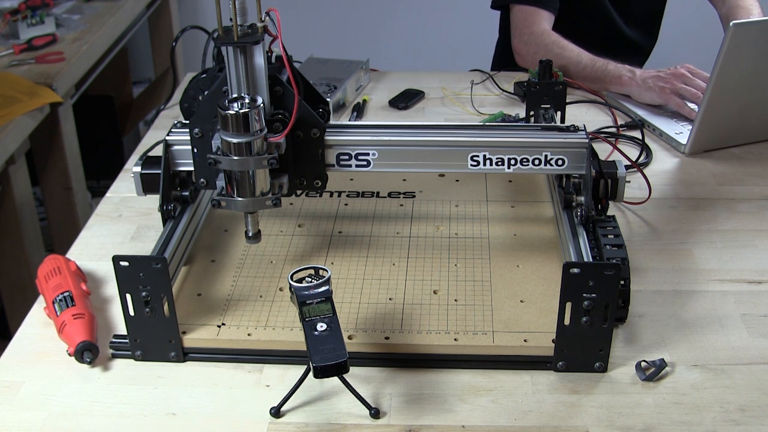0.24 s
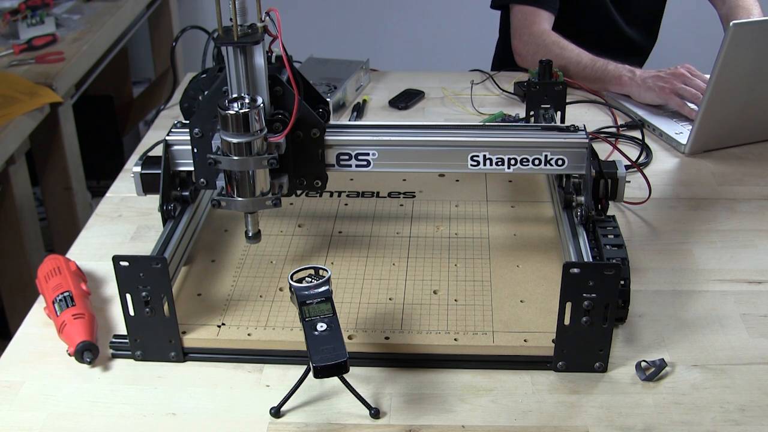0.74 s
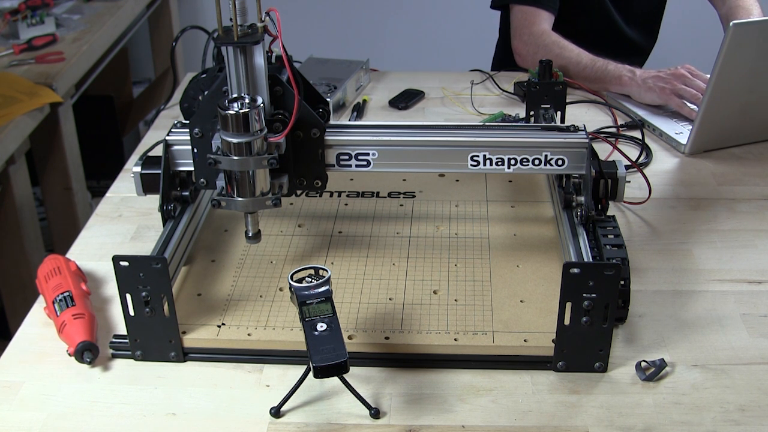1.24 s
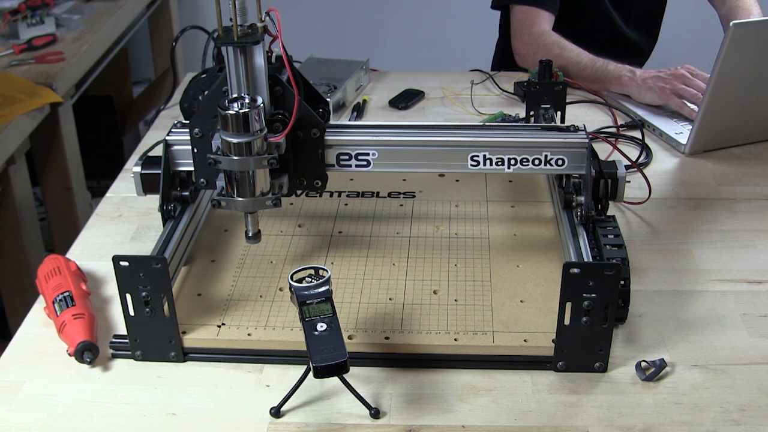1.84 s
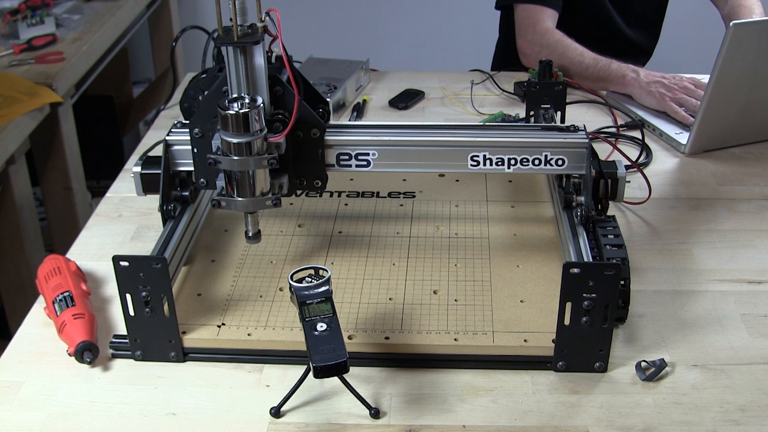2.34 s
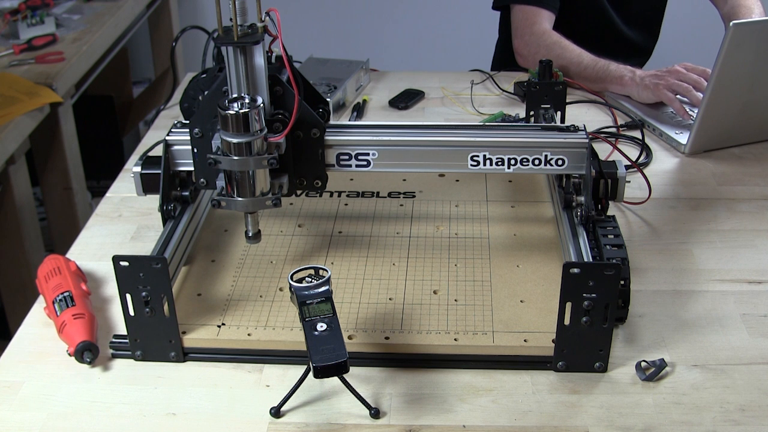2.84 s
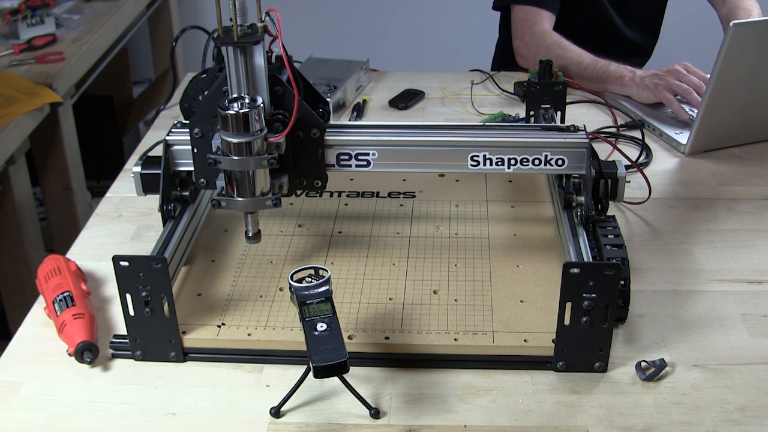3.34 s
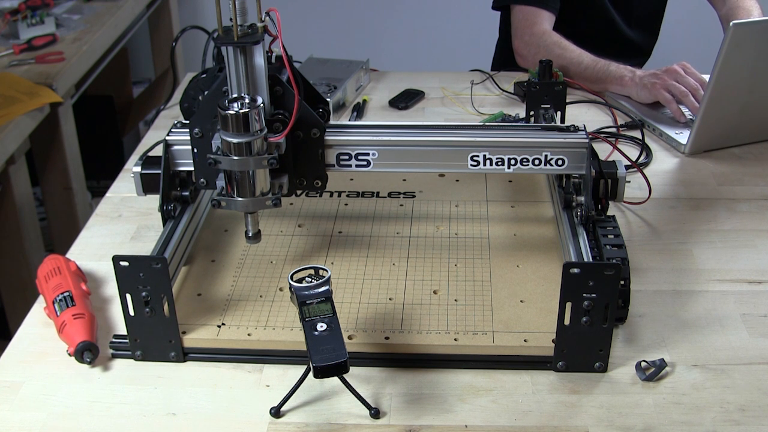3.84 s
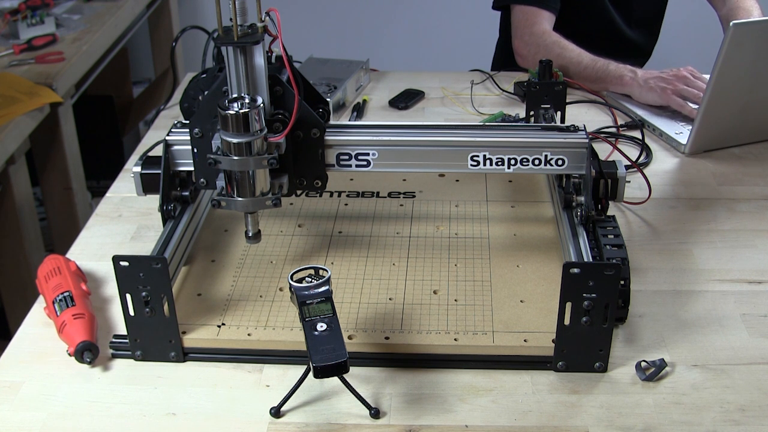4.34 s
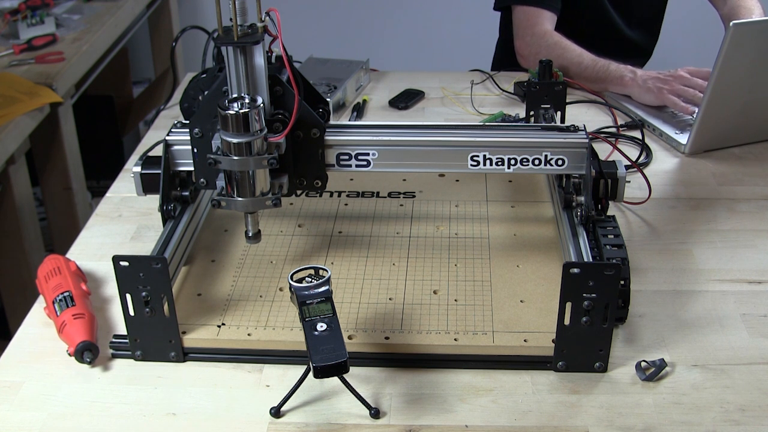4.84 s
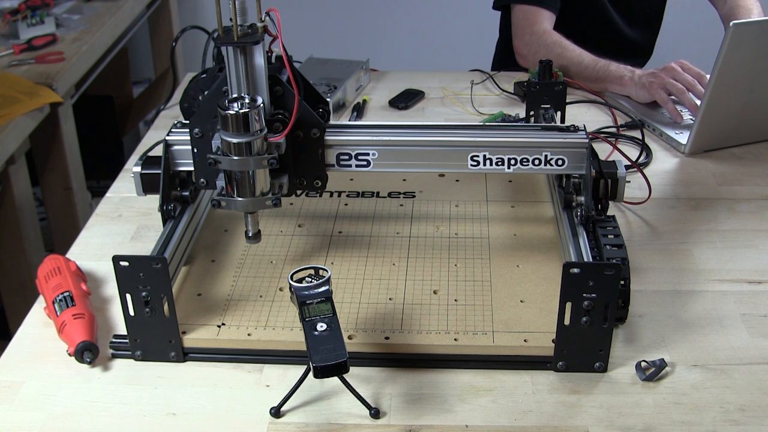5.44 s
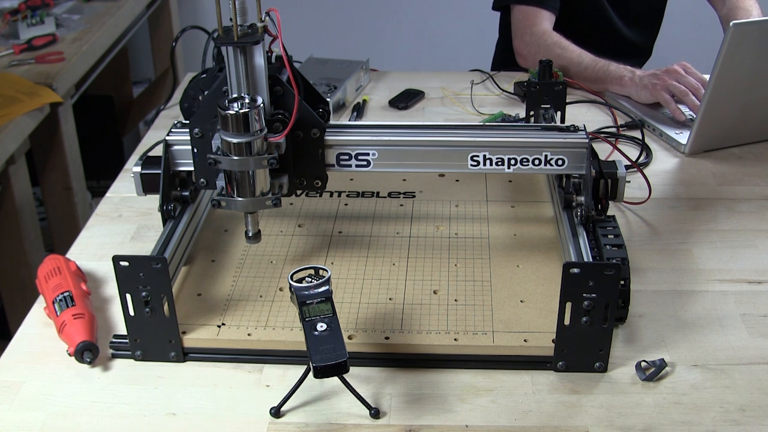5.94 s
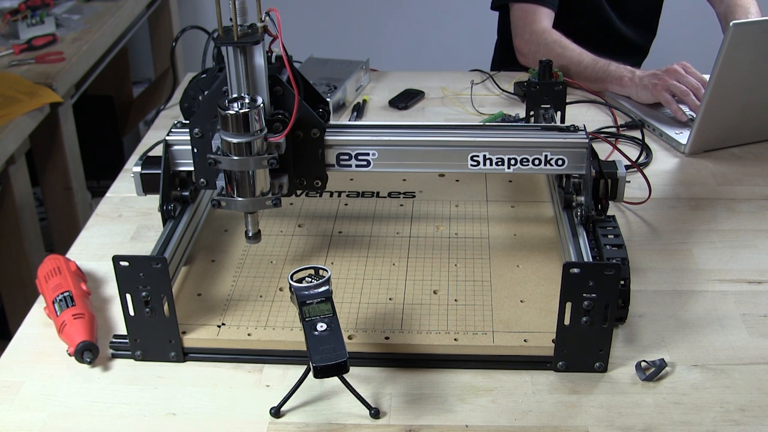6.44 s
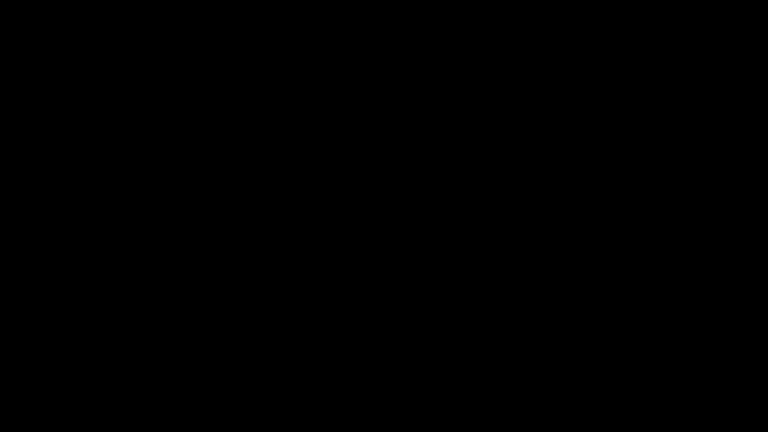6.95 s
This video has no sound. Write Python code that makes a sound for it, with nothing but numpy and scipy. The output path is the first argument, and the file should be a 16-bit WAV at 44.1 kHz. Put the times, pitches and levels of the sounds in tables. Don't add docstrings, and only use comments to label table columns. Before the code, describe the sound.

A small electric spindle runs with a steady bright hiss, peppered by soft thuds and clicks, then is switched off and glides down in pitch.

```python
import sys
import numpy as np
from scipy import signal
from scipy.fft import rfft, irfft, next_fast_len
from scipy.io import wavfile
from scipy.ndimage import uniform_filter1d

SR = 44100
rng = np.random.default_rng(int(sys.argv[2]) if len(sys.argv) > 2 else 0)


def put_to_file(sound):
    columns = np.atleast_2d(sound).T
    safe = np.clip(columns, -1, 1)
    whole_steps = np.round(safe * 32767)
    wavfile.write(sys.argv[1], SR, whole_steps.astype(np.int16))


def how_loud(loudness_db):
    steps = np.asarray(loudness_db, float) / 20
    return 10 ** steps


N = 316638

# frequency in Hz, density in dB per Hz.
FAN_SPECTRUM = [(250, -2), (430, -0.5), (900, -1.5), (1200, -5), (1700, -0.5), (2400, -4), (3400, -2.5),
                (4200, -2.5), (4700, -6.5), (5500, -6.5), (6200, -12.5), (7000, -23), (9000, -30)]
# frequency in Hz, density in dB per Hz.
BRUSH_SPECTRUM = [(500, -9), (2000, -3.5), (2900, 0.5), (3800, -1), (4200, -5.5), (6500, -3), (8600, -4),
                  (10500, -3.5), (13000, -3.5), (13300, -9), (14800, -7.5), (15100, -12), (16000, -13)]
# centre in Hz, width in Hz, level in dB,
# exponent of fall with speed, left minus right in dB.
CASING_RINGS = [(730, 100, -54.5, 3.3, -1), (1670, 100, -62, 2.4, -2.5), (3028, 220, -54, 1.4, 1),
                (3760, 1400, -67, .6, 1), (5076, 250, -51, 3.1, 2.5), (5735, 190, -53.5, 5.2, 0.5),
                (6635, 130, -62, 1.6, -3), (8020, 64, -71, 1.6, -3.5), (9400, 240, -66.5, 1.8, -5),
                (10250, 100, -72, 1.6, 1.5), (12450, 100, -74.5, 1.6, 0.5), (13000, 130, -70, 1.7, 0.5),
                (14000, 120, -70.5, 1.6, -3), (14630, 150, -74, 1.6, -4.5)]
# multiple of shaft speed, level in dB.
SHAFT_LINES = [(5, -63), (6, -71), (7, -68), (8, -62), (17, -68), (18, -66), (45, -75), (61, -78)]
# multiple of shaft speed, left minus right in dB.
BAR_LINES = [(12, 0), (24, 2), (36, 4), (48, 0), (60, 0), (72, 0)]
# level in dB, exponent of fall with speed, change while powered in dB.
BAR_DRIVE = [(2, 4, -4.5), (1, 2, -1.5), (-1.5, 2, -1), (-2.5, 2, -3), (-5.5, 2, -2), (-8, 2, 0)]
# centre in Hz, width in Hz, level in dB,
# exponent of extra fall with speed.
CASING_MODES = [(1560, 300, -54, 0), (2165, 90, -49, 0), (2340, 320, -52.5, 0), (2680, 360, -55, 0),
                (3000, 200, -47, 0), (3280, 450, -52, 0), (3540, 280, -47, 2), (3770, 200, -39.5, 3),
                (4540, 140, -49, 2), (5030, 240, -57, 0), (5680, 300, -56, 0)]
# frequency in Hz, left minus right in dB, unrelated part in dB, left lead in rad.
STEREO_IMAGE = [(397, 0, -14, 0.13), (1150, 0.5, -13.5, 0), (1890, -0.5, -21, 0), (2600, 1.5, -13, 0.11),
                (3260, 0, -21.5, 0.28), (3880, -2.5, -11.5, 0.61), (4240, 2.5, -3.5, 1.1),
                (4870, 2, -13.5, 0.095), (5500, 0.5, -16, 0.025), (6700, -1, -7.5, 0.39),
                (7340, 7.5, -6, 0), (8600, -1, -4.5, .4), (11500, -0.5, -4, 1.4), (15300, 0, -2.5, 1.5)]
# start in seconds, length in seconds, rise in dB.
BITE_SPELLS = [
    (1.36, .46, 3.4),
    (2.34, .64, 3.0),
]
# time in seconds, peak in dB, capsule (0 left, 1 right).
THUDS = [(0.4154, -33, 1), (1.0202, -30.5, 1), (1.5039, -43, 0), (1.5396, -34, 1), (1.9594, -33, 1),
         (2.038, -34, 1), (2.0598, -38, 1), (2.229, -25.5, 0), (2.4551, -30, 0), (3.9022, -37, 1),
         (4.5311, -44.0, 1), (4.6495, -40, 1), (4.7661, -34, 1), (4.8937, -28, 1), (5.1905, -30, 1),
         (5.3416, -22.5, 1), (5.5885, -47, 0)]
# time in seconds, peak in dB, capsule (0 left, 1 right),
# length of the following gap in ms (none if not positive).
CLICKS = [(0.4672, -24.5, 1, 4.5), (0.4897, -41.5, 1, 0.5), (0.7868, -32, 1, 0), (1.0262, -34.5, 0, 3.8),
          (1.074, -31, 1, 6.8), (1.5897, -28.5, 1, 7.5), (2.013, -27, 1, -1), (2.0993, -27, 1, 5.4),
          (2.2728, -25, 0, 0), (2.4895, -27, 0, 4.5), (2.4936, -40, 1, 5), (2.7040, -30, 1, 3.7),
          (2.706, -42, 0, 4), (3.5334, -37, 1, 0), (3.9562, -36, 1, 3.5), (4.0358, -34.5, 1, 6),
          (4.211, -29, 1, 2.5), (4.5815, -37, 1, 1.5), (4.7147, -40, 1, 7), (4.816, -30, 1, 2),
          (4.957, -24.5, 1, 4.5), (5.2502, -27.5, 1, 6.5), (5.39, -24.5, 1, 11), (5.6464, -46, 1, 1.6)]

SHAFT_HZ, CREEP_HZ_PER_S, OFF_S = 207.45, 0.085, 5.4006
DRAG_PER_S, FRICTION_HZ_PER_S = 0.4279, 34.5
FAN_DB, FAN_SPEED_POWER = -41.5, 2.71
BITE_DB, BITE_SAG_DB_PER_S, BITE_SPEED_POWER, SPELL_RAMP_S = -53, 0.26, 1.5, 0.16
CASING_FLOOR_DB, CASING_KNEE_HZ, CASING_FALL_DB_PER_OCTAVE = -64, 4000, 7
ROOM_DB, ROOM_LO_HZ, ROOM_HI_HZ = -76, 350, 1100
GAP_DB, GAP_DB_PER_MS, EDGE_DB = -6, -4.5, -39
FLUTTER_LEAD_MS, FLUTTER_SHARE = 5.2, 0.436
LOW_CUT_HZ, TOP_HZ = 360.4, 15720


def shape(table, hz, column=1):
    table = np.array(table)
    return np.interp(np.log(hz + 1e-9), np.log(table[:, 0]), table[:, column])


def filtered(x, order, hz, kind="low", both_ways=False):
    sos = signal.butter(order, hz, kind, fs=SR, output="sos")
    return signal.sosfiltfilt(sos, x) if both_ways else signal.sosfilt(sos, x)


def walk(rate_hz):
    hold_ms = int(1000 / rate_hz)
    steps = int(N / SR * 1000) + 2
    levels = np.repeat(rng.standard_normal(steps // hold_ms + 1), hold_ms)
    levels = uniform_filter1d(uniform_filter1d(levels, hold_ms), hold_ms)
    return 1.3 * np.interp(np.arange(N) * 1000 / SR, np.arange(len(levels)), levels)


def panned(x, lean_db):
    return x * how_loud(np.array([[lean_db / 2], [-lean_db / 2]]))


def stereo_noise():
    size = next_fast_len(N)
    hz = np.arange(size // 2 + 1) * SR / size
    mid, side = rfft(rng.standard_normal((2, size)))
    side = side * how_loud(shape(STEREO_IMAGE, hz, column=2))
    lead_rad = shape(STEREO_IMAGE, hz, column=3)
    lean = how_loud(shape(STEREO_IMAGE, hz) / 2) * np.exp(0.5j * lead_rad)
    return np.array([(mid + side) * lean, (mid - side) / lean]), hz


def shaft():
    t = np.arange(N) / SR
    rest_hz = FRICTION_HZ_PER_S / DRAG_PER_S
    powered_hz = SHAFT_HZ + CREEP_HZ_PER_S * np.minimum(t, OFF_S)
    return (powered_hz + rest_hz) * np.exp(-DRAG_PER_S * np.maximum(t - OFF_S, 0)) - rest_hz


def bite(speed):
    t = np.arange(N) / SR
    db = BITE_DB - BITE_SAG_DB_PER_S * np.minimum(t, OFF_S) + 20 * BITE_SPEED_POWER * np.log10(speed)
    for start_s, length_s, rise_db in BITE_SPELLS:
        inside_s = np.minimum(t - start_s, start_s + length_s - t)
        db = db + rise_db * np.clip(inside_s / SPELL_RAMP_S + 0.5, 0, 1)
    return db


def rush(spectrum, gust_db, flicker_db):
    spectra, hz = stereo_noise()
    spectra = spectra * how_loud(shape(spectrum, hz))
    out, gust = 0, gust_db * walk(9)
    for octave in range(8, 15):
        band = np.cos(np.pi / 2 * np.clip(np.log2(hz + 1e-9) - octave, -1, 1)) ** 2
        out = out + irfft(spectra * band)[:, :N] * how_loud(gust + flicker_db * walk(14))
    return out / np.sqrt(np.mean(out.mean(0) ** 2))


def fan(speed):
    return rush(FAN_SPECTRUM, gust_db=0.5, flicker_db=0.36) * how_loud(FAN_DB) * speed ** FAN_SPEED_POWER


def brush(bite_db):
    return rush(BRUSH_SPECTRUM, gust_db=0.0, flicker_db=0.1) * how_loud(bite_db + 3.0)


def wear(hz, speed, bite_db, spread_db=3.5, count=96):
    size = 2048
    harmonics = how_loud(spread_db * rng.standard_normal(count)) * np.exp(2j * np.pi * rng.random(count))
    turn = irfft(np.pad(harmonics, (1, size // 2 - count)))
    place = np.cumsum(hz) / SR % 1 * size
    comb = np.interp(place, np.arange(size + 1), np.append(turn, turn[0]))
    comb = filtered(comb, 3, [2800, 5600], "band")
    return comb / comb.std() * how_loud(bite_db - 7) / np.sqrt(speed)


def rings(speed, bite_db):
    spectra, hz = stereo_noise()
    out, swell = 0, how_loud(np.clip(bite_db + 54.0, 0, None))
    for centre_hz, width_hz, db, power, lean_db in CASING_RINGS:
        ring = irfft(spectra / (1 + (2 * (hz - centre_hz) / width_hz) ** 2))[:, :N]
        gain = how_loud(db) / ring.mean(0).std() * speed ** power
        if centre_hz > 7500:
            gain = gain * swell
        out = out + panned(ring * gain, lean_db)
    return out


def casing(hz, speed):
    octaves = np.log2(np.maximum(hz / CASING_KNEE_HZ, 1))
    power_gain = how_loud(CASING_FLOOR_DB - CASING_FALL_DB_PER_OCTAVE * octaves) ** 2
    for centre_hz, width_hz, db, power in CASING_MODES:
        mode = how_loud(db) * speed ** power / (1 + (2 * (hz - centre_hz) / width_hz) ** 2)
        power_gain = power_gain + mode ** 2
    return np.sqrt(power_gain)


def sine(order, turns):
    return np.sqrt(2) * np.sin(2 * np.pi * (order * turns + rng.random()))


def shaft_lines(turns, speed):
    out = np.zeros((2, N))
    for order, db in SHAFT_LINES:
        out += sine(order, turns) * how_loud(db + 2.2 * walk(5)) * speed ** 2.6
    return out


def bar_lines(turns, hz, speed):
    out = np.zeros((2, N))
    sample = np.arange(N)
    coarse = sample[::64]
    powered = np.clip((OFF_S - sample / SR) / 0.03 + 1, 0, 1)
    for (order, lean_db), (db, power, powered_db) in zip(BAR_LINES, BAR_DRIVE):
        response = np.interp(sample, coarse, casing(order * hz[coarse], speed[coarse]))
        gain = response * speed ** power * how_loud(db + powered_db * powered + 0.9 * walk(8.5))
        out += panned(sine(order, turns) * gain, lean_db)
    return out


def room():
    mid, side = filtered(rng.standard_normal((2, N)), 2, [ROOM_LO_HZ, ROOM_HI_HZ], "band")
    return (mid + 0.4 * side * np.array([[1], [-1]])) / mid.std() * how_loud(ROOM_DB)


def draught(speed, db=-106, gust_db=6):
    rumble = filtered(rng.standard_normal(N), 2, 260)
    return rumble / rumble.std() * how_loud(db + gust_db * walk(16)) * speed ** 3


def bursts(table, pulse):
    out = np.zeros((2, N))
    for s, db, capsule, *_ in table:
        out[int(capsule > 0.5), int(s * SR)] = how_loud(db) * rng.choice([-1, 1])
    return signal.fftconvolve(out, pulse[None] / np.abs(pulse).max(), "same")


def hiss_gaps():
    depth_db, edges = np.zeros((2, N)), []
    gaps = [(s, capsule, ms) for s, _, capsule, ms in CLICKS if ms > 0]
    gaps += [(s - FLUTTER_LEAD_MS / 1000, capsule, ms * FLUTTER_SHARE) for s, capsule, ms in gaps]
    for s, capsule, ms in gaps:
        end_s = s + ms / 1000
        depth_db[int(capsule > 0.5), int(s * SR):int(end_s * SR)] = GAP_DB + GAP_DB_PER_MS * ms
        edges += [(s, EDGE_DB, capsule), (end_s, EDGE_DB, capsule)]
    return uniform_filter1d(depth_db, size=12), edges


def overload(x, thud_hz=430, click_hz=980, split_hz=800):
    depth_db, edges = hiss_gaps()
    lows = filtered(x, 4, split_hz, both_ways=True)
    x = lows + (x - lows) * how_loud(depth_db)
    t = np.arange(-1024, 1025) / SR
    thud = np.cos(2 * np.pi * thud_hz * t) * np.exp(-np.abs(t) / 0.0017)
    thud = thud + 0.61 * np.roll(thud, int(-0.0048 * SR))
    click = np.cos(2 * np.pi * click_hz * t) * np.exp(-np.abs(t) / 0.0014)
    click = click + 1.2 * np.exp(-(t / 0.00011) ** 2)
    click = filtered(click, 4, split_hz, "high", both_ways=True)
    return x + bursts(THUDS, thud) + 1.42 * bursts(CLICKS, click) + 1.3 * bursts(edges, click)


def scene():
    hz = shaft()
    speed = hz / SHAFT_HZ
    bite_db = bite(speed)
    turns = np.cumsum(hz * (1 + 0.00043 * walk(12))) / SR
    noise = fan(speed) + brush(bite_db) + wear(hz, speed, bite_db) + rings(speed, bite_db)
    tones = shaft_lines(turns, speed) + bar_lines(turns, hz, speed)
    return noise + tones + room()


def band_limit(x):
    return signal.sosfilt(signal.butter(12, 16070, fs=SR, output="sos"), x)


def record(dry):
    low_cut = signal.ellip(5, 0.4, 42, LOW_CUT_HZ, "high", fs=SR, output="sos")
    top_cut = signal.ellip(10, 0.2, 40, TOP_HZ, fs=SR, output="sos")
    x = signal.sosfiltfilt(low_cut, overload(dry))
    x = x + draught(shaft() / SHAFT_HZ)
    x = signal.sosfiltfilt(top_cut, x)
    return band_limit(x)


dry = scene()
out = record(dry)
put_to_file(out)
```